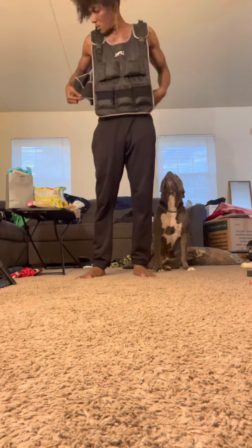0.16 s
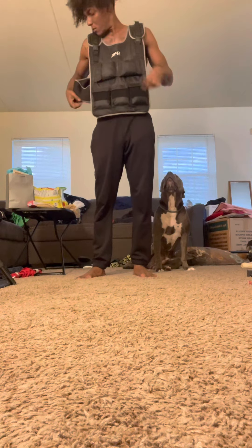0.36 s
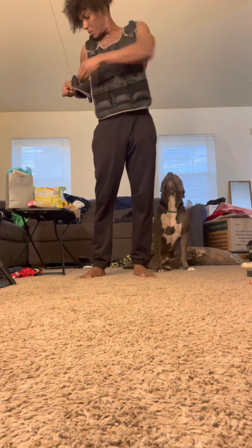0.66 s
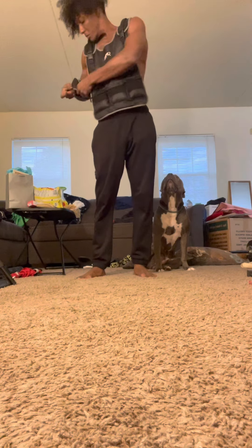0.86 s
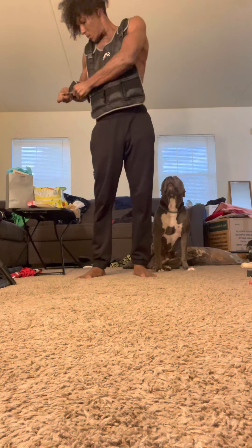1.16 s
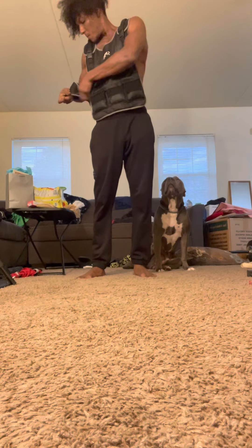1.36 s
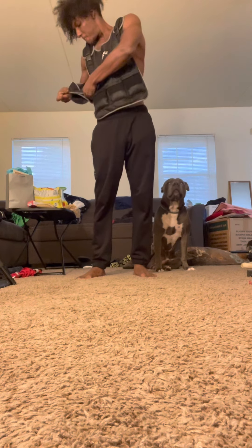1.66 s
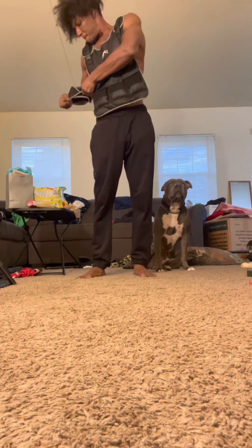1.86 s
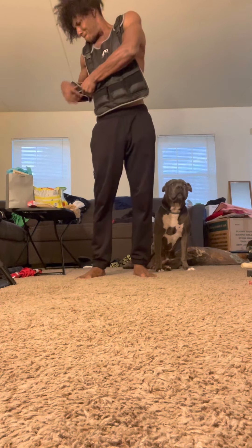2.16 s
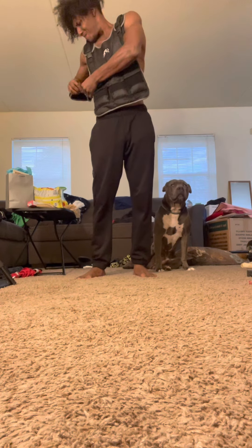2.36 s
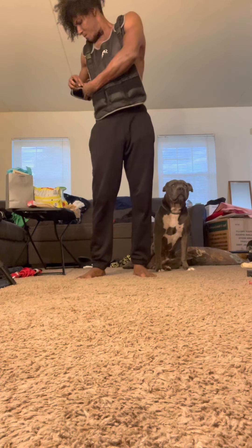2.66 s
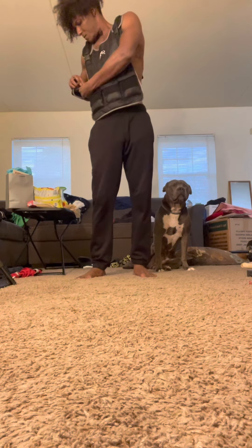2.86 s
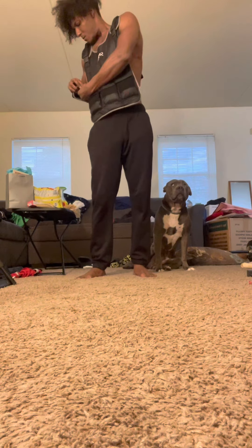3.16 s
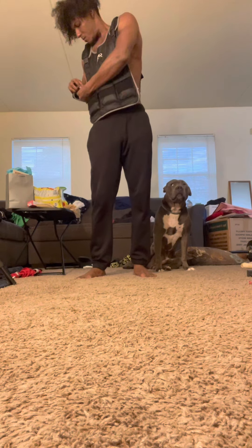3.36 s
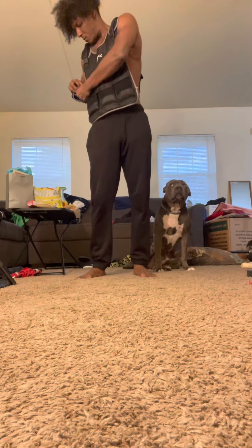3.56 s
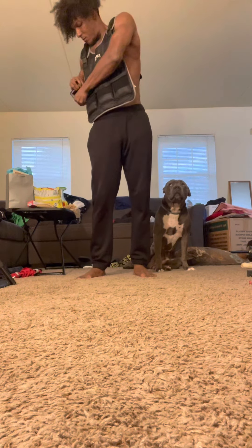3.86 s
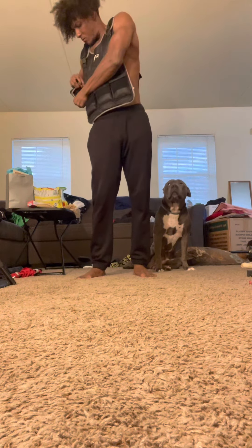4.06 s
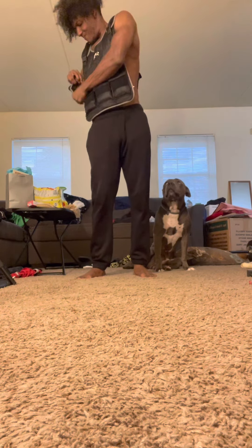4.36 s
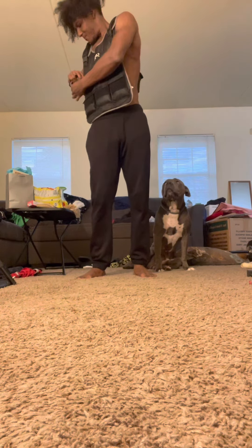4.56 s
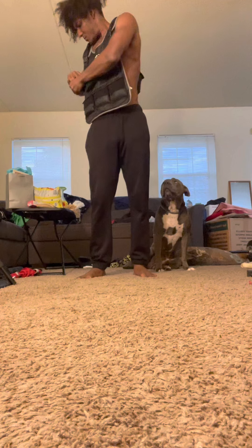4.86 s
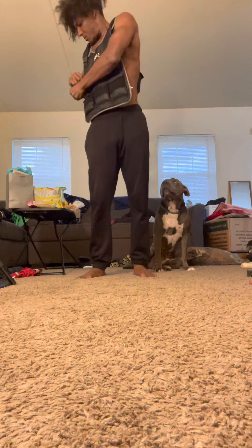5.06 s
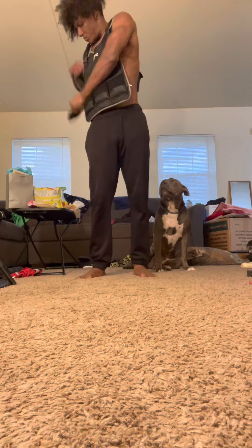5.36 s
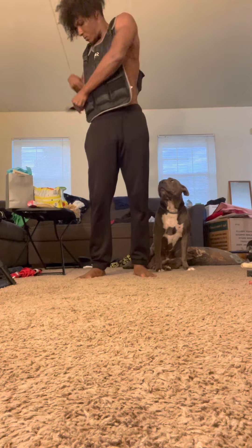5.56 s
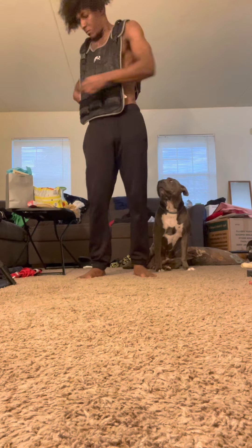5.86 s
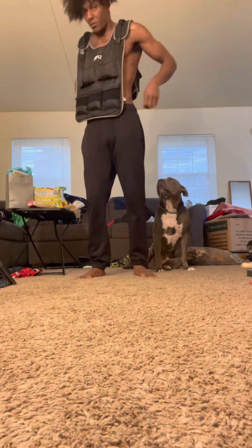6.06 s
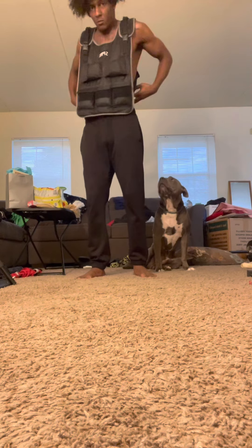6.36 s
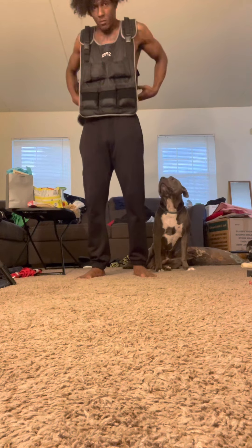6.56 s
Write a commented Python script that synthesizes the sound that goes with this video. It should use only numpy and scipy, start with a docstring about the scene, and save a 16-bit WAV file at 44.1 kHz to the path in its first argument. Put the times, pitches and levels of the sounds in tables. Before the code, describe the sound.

A quiet carpeted room with a very faint low rumble and short, soft reflections, heard from a phone about two metres away. From 0 to 2.7 seconds, fingers work at a padded vest's straps: small dry crunches and ticks, clearer near 0.9-1.05, 1.8-1.9 and 2.6, with thin nylon rustle and dull padding pats. Around 3 it is almost still, with a tiny bump and faint swishes. At about 3.55 hook-and-loop tape begins to rip, growing into a loud, stuttering rasp of crackling slips until 4.3. Small tugs and rustle fill 4.4-4.9. A second, harder and denser rip runs from 4.9 to 5.4, turning fuller and duller after 5.2 as the panel comes free, with a low soft thump near 5.35. It dies by 5.5. Quiet cloth slides follow, then several light crunches from 6.2 to 6.7.

```python
"""Ripping open a padded vest

Someone handles the hook-and-loop straps of a padded vest in a quiet carpeted room, two metres from a phone on the floor.
Cloth rustles as filtered random clicks, and the straps crunch under the fingers in short click showers.
A flap is ripped open in two pulls, a dense click stream broken by uneven slips.
As it comes free, noise and dull clicks deepen the loose panel, and low decaying tones thump as it flops."""
import sys
import numpy as np
from scipy import signal
from scipy.fft import rfft, irfft
from scipy.io import wavfile

SR = 44100
rng = np.random.default_rng(int(sys.argv[2]) if len(sys.argv) > 2 else 0)


def to_wav(s):
    """Save 16-bit WAV."""
    ch = np.atleast_2d(s).T  # columns
    pcm = np.round(np.clip(ch, -1, 1) * 32767)  # PCM
    wavfile.write(sys.argv[1], SR, pcm.astype(np.int16))


N = 295470
T = np.arange(N) / SR


def undb(db):
    """Decibels to gain."""
    return 10 ** (np.asarray(db) / 20)


def unit(x):
    """Scale to rms 1."""
    return x / np.sqrt(np.mean(x ** 2))


def spectrum(points, size=4096):
    """Join (Hz, dB) points on a log-frequency axis."""
    hz, db = np.transpose(points)
    bins_hz = np.fft.rfftfreq(size, 1 / SR)
    return np.interp(np.log(bins_hz + 1), np.log(hz), db)


def causal(db):
    """Minimum-phase impulse response of a dB spectrum."""
    cepstrum = irfft(np.log(undb(db)))
    half = len(cepstrum) // 2
    # fold the second half onto the first
    cepstrum[1:half] *= 2
    cepstrum[half + 1:] = 0
    return irfft(np.exp(rfft(cepstrum)))


def through(x, response):
    """Convolve, keeping the length."""
    return signal.oaconvolve(x, response)[:len(x)]


def colour(x, points):
    """Give x a spectrum; white input keeps its power."""
    response = causal(spectrum(points))
    return through(x, response / np.linalg.norm(response))


def gains(tables, fade_s=0.021):
    """One gain curve per dB column, fading out beyond the ends of each table."""
    out = 0
    for table in tables:
        s, *columns = np.transpose(table)
        inside_s = np.minimum(T - s[0], s[-1] - T)
        gate = np.clip(1 + inside_s / fade_s, 0, 1)
        out = out + gate * undb([np.interp(T, s, column) for column in columns])
    return out


def walk(rate):
    """Random wandering, joined by straight lines between `rate` knots per second."""
    knots = rng.standard_normal(8192)
    return np.interp(T * rate, np.arange(len(knots)), knots)


def snaps(rate, spread_db):
    """Random clicks, `rate` per second on average, many small and a few large; rms 1."""
    size = undb(spread_db * np.minimum(rng.exponential(size=N), 3.5))
    struck = rng.random(N) < rate / SR
    return unit(struck * size * rng.choice([-1, 1], N))


def add(track, s, sound):
    """Mix a sound into a track at time s."""
    start = max(int(s * SR), 0)
    track[..., start:start + sound.shape[-1]] += sound[..., :max(N - start, 0)]


def burst(grain, s, length, rise):
    """A shower of clicks that swells quickly and dies away; energy 1."""
    t = T[:SR // 8]
    shape = (1 - np.exp(-t / rise)) * np.exp(-t / length)
    shower = shape * grain.take(int(s * SR) + np.arange(len(t)), mode="wrap")
    return shower / np.linalg.norm(shower)


# spectrum of the house rumble: pitch_hz, level_db
HOUSE_TONE = [(20, -55), (35, -21), (55, -3), (76, 6.5), (100, -8), (125, 2), (180, -10), (237, -2.5),
              (400, -26), (800, -21.5), (2000, -32.5), (5000, -26), (10000, -32.5), (16000, -63)]
HUSH_DB = -59.5  # rms, before the stereo spread


def hush():
    """Low steady rumble of the house, as two independent coloured noises; returns mid and side."""
    return np.array([undb(HUSH_DB) * colour(rng.standard_normal(N), HOUSE_TONE) for _ in range(2)])


# soft bumps of the padded vest: start_s, pitch_hz, level_db, rise_s
VEST_BUMPS = [(1.592, 125, -50.5, 0.0049), (1.811, 131, -48.5, 0.014), (3.052, 256, -52, 0.009),
              (3.076, 144, -45, 0.0067), (5.333, 65.5, -32, 0.0094), (5.37, 80, -25.5, 0.011),
              (6.343, 86.5, -47, 0.014)]


def bumps():
    """The heavy padding swings a few cycles and stops."""
    out, t = np.zeros(N), T[:SR // 4]
    for s, hz, db, rise in VEST_BUMPS:
        swell = t / rise * np.exp(1 - t / rise)  # peaks at 1
        add(out, s, undb(db) * swell * np.sin(2 * np.pi * hz * t))
    return out


# cloth sliding before, between and after the pulls, one list each: time_s, nylon_level_db, padding_level_db
CLOTH_RUBS = [
    [(0.0, -65, -61.5), (0.17, -70.5, -68.5), (0.34, -70, -94), (0.72, -62, -65), (0.94, -57, -58.5),
     (1.45, -71, -75), (1.86, -65, -67), (2.05, -71.5, -92), (2.33, -73, -83), (2.5, -63.5, -88),
     (2.66, -61.5, -60), (2.82, -68, -77), (3.1, -80, -81), (3.52, -75.5, -87)],
    [(4.4, -54, -56.5), (4.52, -63.5, -66.5), (4.768, -61, -65), (4.88, -56.5, -61)],
    [(5.5, -51, -55), (5.596, -61, -56.5), (5.722, -59.5, -60), (5.96, -64.5, -62.5), (6.234, -64, -73),
     (6.414, -61.5, -64), (6.7, -57, -62)],
]
# smooth nylon swishing over itself: centre_s, pitch_hz, level_db, length_s
NYLON_SWISHES = [(0.061, 5300, -54, 0.014), (0.35, 10000, -69, 0.052), (3.015, 1920, -69.5, 0.022),
                 (3.378, 2050, -66, 0.023)]
# spectrum of the cloth, also heard in the grips: pitch_hz, level_db
CLOTH_TONE = [(100, -17), (500, -9), (950, -1), (1500, 6), (2200, 0), (3200, 0), (4200, -0.5), (5200, -7.5),
              (7000, -7), (14000, -31.5)]
# spectrum of the panel, also heard in the rip: pitch_hz, level_db
PANEL_TONE = [(30, -40), (100, -3.5), (190, -5), (260, 0.5), (550, 3.5), (750, -4), (1000, -1), (1300, 0),
              (1800, -23.5), (6000, -45)]
# bright spectrum of the treble, also heard in the rip: pitch_hz, level_db
TREBLE_TONE = [(1500, -7), (4000, -41), (5800, 11.5), (8000, 6.5), (10500, 1), (13000, -4), (14500, -9),
               (15500, -44)]


def rustle(treble_db=-8, catch_db=1.5, swish_q=5):
    """Woven cloth slides and catches, thread over thread; a fast slide sings at the rate of the weave."""
    rub, padding = gains(CLOTH_RUBS)
    catching = undb(catch_db * walk(45))
    threads = unit(snaps(rate=2200, spread_db=2.5) * catching)
    # now and then a stray hook ticks
    threads = threads + 0.5 * snaps(rate=40, spread_db=2.5)
    swishes = np.zeros(N)
    for s, hz, db, length in NYLON_SWISHES:
        singing = unit(signal.lfilter(*signal.iirpeak(hz, swish_q, fs=SR), threads))
        swishes += undb(db) * np.exp(-((T - s) / length) ** 2) * singing
    return (colour(rub * threads, CLOTH_TONE) + swishes
            + colour(padding * threads, PANEL_TONE)
            + colour(undb(treble_db) * rub * threads, TREBLE_TONE))


# grips and tugs on the straps, levels before the trims in grips():
# start_s, level_db, padding_re_level_db, treble_re_level_db, length_s, first_click_sharpness_db
STRAP_GRIPS = [(0.0575, -43.5, -24, -38, 0.018, -1), (0.332, -46, -4.5, -24, 0.025, -3),
               (0.4603, -40.5, -20.5, -19.5, 0.0084, -0.5), (0.568, -36.5, -14, -23.5, 0.009, 5.5),
               (0.647, -42.5, -16, -18, 0.0079, 2), (0.698, -38.5, -17, -19.5, 0.0085, 3),
               (0.742, -41.5, -17, -24, 0.0075, 3), (0.9296, -29.5, -22.5, -45, 0.014, -4),
               (1.023, -37, -44, -16, 0.005, 3.5), (1.042, -30.5, -31, -27, 0.019, -4),
               (1.2501, -39.5, -25, -49, 0.012, 5), (1.5633, -45.5, -14.5, -28, 0.01, 1.5),
               (1.745, -39, -13, -43, 0.013, 5.5), (1.8054, -31, -11.5, -25.5, 0.012, -5),
               (1.934, -30.5, -30, -41, 0.0061, -1.5), (2.0034, -43.5, -28, -22, 0.014, -1),
               (2.3046, -39, -12, -19, 0.028, 7), (2.4453, -48.5, -11, -9, 0.01, 5),
               (2.4663, -38, -15.5, -21, 0.016, 3), (2.611, -34, -53, -7.5, 0.0055, 3.5),
               (2.642, -35.5, -40, -20.5, 0.016, -6), (3.047, -47.5, -2, -26, 0.014, -4),
               (4.494, -39, -17, -29, 0.0071, 3.5), (4.5835, -40.5, -37, -23, 0.015, 2),
               (4.7187, -29, -11, -22.5, 0.0054, 4.5), (4.805, -31, -38, -18.5, 0.0092, 4),
               (4.835, -33, -29, -9, 0.0059, -12), (4.867, -36, -21, -17, 0.0091, -6),
               (6.2217, -34.5, -14, -30, 0.019, 1.5), (6.291, -35.5, -12, -29, 0.028, 0),
               (6.358, -30, -22, -28, 0.01, -7), (6.503, -37.5, -9.5, -14, 0.033, 0),
               (6.6268, -34.5, -14, -19, 0.0072, -1), (6.686, -35.5, -12, -21, 0.013, 2.5)]
# dull answer of the padding, also heard in the rip: pitch_hz, level_db
PAT_TONE = [(80, -19), (200, -4), (520, 1.5), (750, 0.5), (1250, -0.5), (2000, -15.5), (6000, -30),
            (15000, -53)]
# bright tick of stiff nylon under the fingers: pitch_hz, level_db
NYLON_TONE = [(1000, -19.5), (2500, -10), (4300, 0.5), (5300, -3.5), (8000, -1.5), (11000, -8.5),
              (13500, -16), (15500, -26)]
GRIP_S = 0.006  # length at which a crunch keeps energy 1 before its level; longer ones get more


def grips(click_db=8, crunch_db=12, pat_db=28, treble_db=27, tick=0.57, pat_lingers=1.5):
    """Each grip is a click and a short crunch of hooks, with a dull pat from the padding."""
    crunches, pats, ticks = np.zeros((3, N))
    grain = snaps(rate=3000, spread_db=2.5)
    for s, db, padding, treble, length, sharpness in STRAP_GRIPS:
        shower = burst(grain, s, length, rise=0.0015) * np.sqrt(length / GRIP_S)
        bright_db = db + treble + treble_db
        add(crunches, s, undb(db + crunch_db) * shower)
        # one-sample first clicks
        add(crunches, s, undb([db + click_db + sharpness]))
        add(ticks, s, undb(bright_db) * shower)
        add(ticks, s, tick * undb([bright_db + sharpness]))
        pat = burst(grain, s, length * pat_lingers, rise=0.0039)
        add(pats, s, undb(db + padding + pat_db) * pat)
    return colour(crunches, CLOTH_TONE) + colour(pats, PAT_TONE) + colour(ticks, NYLON_TONE)


# big slips, where a patch of hooks lets go at once, levels before slip_db: start_s, level_db, length_s
BIG_SLIPS = [(3.5683, -31.5, 0.0026), (3.609, -25, 0.0041), (3.657, -18.5, 0.005), (3.7472, -14.5, 0.004),
             (3.7793, -16.5, 0.0057), (3.797, -15.5, 0.004), (3.8095, -13, 0.0057), (3.8867, -13, 0.0058),
             (3.8962, -11, 0.0054), (3.933, -32, 0.0041), (3.9913, -16.5, 0.0077), (4.0154, -13, 0.004),
             (4.0404, -13.5, 0.005), (4.0811, -20.5, 0.0044), (4.1013, -13.5, 0.0049),
             (4.132, -18.5, 0.0043), (4.1814, -18, 0.005), (4.2136, -15.5, 0.0075), (4.911, -38, 0.004),
             (4.9325, -16.5, 0.005), (4.9686, -11, 0.0047), (4.979, -18, 0.0037), (5.022, -12, 0.0083),
             (5.0384, -14, 0.0043), (5.0554, -11, 0.0041), (5.0868, -12.5, 0.0035), (5.117, -14, 0.0086),
             (5.1602, -16, 0.005), (5.181, -16, 0.0047), (5.194, -17, 0.0065), (5.3118, -14, 0.011)]
# the flap holds fast for a moment before each big slip
STICK_S, STICK_DB = 0.014, -2


def sticking():
    """Gain of the stream of hooks: it falls as the flap holds and comes back with the slip."""
    held, t = np.zeros(N), T[:SR // 8]
    hold = np.exp(-(t[::-1] / STICK_S) ** 2)
    for s, _, _ in BIG_SLIPS:
        add(held, s - t[-1], hold)
    return undb(STICK_DB * np.minimum(held, 1))


SLIP_S = 0.003  # length at which a slip keeps energy 1 before its level; longer ones get more


def torn_patches(slip_db=9.0, snap=0.43, rise_s=0.0024):
    """Each big slip is a shower of hook clicks with one sharp snap near its start."""
    patches, grain = np.zeros(N), snaps(rate=5900, spread_db=5.5)
    for s, db, length in BIG_SLIPS:
        slip = burst(grain, s, length, rise=rise_s) * np.sqrt(length / SLIP_S)
        slip[SR // 2000] += snap  # half a millisecond in
        add(patches, s, undb(db + slip_db) * slip)
    return patches


SMALL_SLIPS_PER_S, SMALL_SLIP_S = 120, 0.0022  # mean rate; decay time


def juddering(judder_db=2.0):
    """Uneven gain of the peel: random wandering, lifted by small slips that die away at once."""
    starts = 1.0 * (rng.random(N) < SMALL_SLIPS_PER_S / SR)
    slipping = through(starts, np.exp(-T[:SR // 8] / SMALL_SLIP_S))
    return undb(judder_db * walk(260)) * (1 + slipping)


# the two pulls, one list each; how fast the flap peels, as a level before the layer trims: time_s, level_db
PULLS = [
    [(3.54, -61.5), (3.596, -50), (3.63, -54), (3.666, -45.5), (3.706, -57), (3.766, -42), (4.248, -45),
     (4.324, -52.5), (4.4, -85)],
    [(4.9, -74), (4.912, -36), (4.928, -45.5), (5.04, -43), (5.154, -43), (5.206, -36), (5.24, -40.5),
     (5.364, -38.5), (5.48, -63.5)],
]
# a taut flap rasps louder, one value per pull, before rasp_db: rasp_re_peel_db
PULL_RASP_DB = [5, 8]
# spectrum of the snapping hooks: pitch_hz, level_db
HOOK_TONE = [(100, -32.5), (300, -19.5), (600, -5.5), (950, -8.5), (1400, -0.5), (2050, 0), (3000, -3),
             (4200, -2.5), (5200, -8.5), (7000, -23.5), (14000, -30)]
# spectrum of the fluttering loose panel: pitch_hz, level_db
LOOSE_TONE = [(25, -31), (60, -18), (100, -2.5), (170, -0.5), (250, 2), (350, -7.5), (600, -6), (2000, -27),
              (12000, -48)]
# late in the second pull the panel comes free, then goes slack, and the rasp fades by FREE_RASP_DB
FREE_S, FREE_TAKES_S, SLACK_TAKES_S, FREE_RASP_DB = 5.168, 0.0067, 0.2, -5.5


def rip(rasp_db=1.0, panel_db=-4, treble_db=4.0, flap_db=1, padding_db=1,
        slip_treble_db=-18, slip_panel_db=-14):
    """Hooks snap loose in a juddering stream and shake the panel; slips tear out whole patches."""
    pulls = [gains([curve])[0] for curve in PULLS]
    peel, stick = sum(pulls), sticking()
    free = np.clip((T - FREE_S) / FREE_TAKES_S, 0, 1)
    slack = np.clip((T - FREE_S) / SLACK_TAKES_S, 0, 1)
    taut = sum(undb(db) * pull for db, pull in zip(PULL_RASP_DB, pulls))
    rasp = stick * taut * undb(rasp_db + FREE_RASP_DB * slack)
    panel = undb(panel_db) * stick * peel
    treble = undb(treble_db) * np.sqrt(stick) * peel
    # single hooks snap, and the fabric under them jerks in the same uneven rhythm
    judder = juddering()
    hooks = unit(snaps(rate=1000, spread_db=3.3) * judder)
    jerks = unit(snaps(rate=2000, spread_db=2.5) * judder)
    patches = torn_patches()
    flutter = undb(flap_db) * slack * peel * rng.standard_normal(N)
    return (colour(rasp * hooks + patches, HOOK_TONE)
            + colour(panel * jerks + undb(slip_panel_db) * patches, PANEL_TONE)
            + colour(undb(padding_db) * free * peel * jerks, PAT_TONE)
            + colour(treble * hooks + undb(slip_treble_db) * patches, TREBLE_TONE)
            + colour(flutter, LOOSE_TONE))


def reflections(t60_s=0.33, treble_t60_s=0.32, early_db=-3, early_s=0.0074):
    """One echo pattern of the room: sparse early echoes and a short diffuse tail."""
    t = T[:SR // 2]
    low, high = (signal.butter(2, 4500, kind, fs=SR, output="sos") for kind in ("low", "high"))
    noise = rng.standard_normal((3, len(t)))
    tail = signal.sosfilt(low, noise[0]) * undb(-60 * t / t60_s)
    tail += signal.sosfilt(high, noise[1]) * undb(-60 * t / treble_t60_s)
    tail *= np.minimum(t / 0.0093, 1)  # the tail builds up over 9.3 ms
    sparse = (rng.random(len(t)) < 2500 / SR) * (t > 0.002)
    early = noise[2] * np.exp(-t / early_s) * sparse
    return tail / np.linalg.norm(tail) + undb(early_db) * early / np.linalg.norm(early)


def room(x, wet_db=-3, count=4):
    """Direct sound plus echoes whose pattern shifts at random as the hands move; returns mid and side."""
    blend = np.array([walk(12) for _ in range(count)]) ** 2
    blend /= np.linalg.norm(blend, axis=0)
    mid, side = (undb(wet_db) * sum(through(x * share, reflections()) for share in blend)
                 for _ in range(2))
    # the first sound in the side is a glancing bounce, a millisecond late
    glance = np.roll(x, SR // 1000)
    return 0.87 * np.array([x + mid, glance + side])


# stereo width: pitch_hz, side_re_mid_db
STEREO_WIDTH = [(60, -22), (350, -13), (750, -9), (1000, 4.5), (1450, -7.5), (1900, -11), (2300, -21.5),
                (2950, 1), (3700, -9), (4500, 0), (4900, -8), (5200, -4.5), (6000, -5.5), (10600, -9),
                (11300, -26)]


def scene():
    """Vest and room, spread to left and right."""
    mid, side = room(rip() + grips() + rustle()) + hush()
    width_db = spectrum(STEREO_WIDTH)
    # the mid gives up the power that the side takes
    mid_db = -10 * np.log10(1 + undb(width_db) ** 2)
    mid = through(mid + bumps(), causal(mid_db))
    side = through(side, causal(mid_db + width_db))
    return np.array([mid + side, mid - side])


# the phone's own resonances, before trim_db: pitch_hz, width_hz, peak_db
PHONE_MODES = [(1796, 32, 8), (2032, 184, 8), (2157, 100, 10.5), (2550, 55, 6.5), (2776, 51, 9.5)]
# phase between the channels: pitch_hz, left_lead_radians
LEFT_LEAD = [(0, 0), (750, 0), (1250, 1), (1650, .2), (2800, .9), (3400, -.1), (4350, .2), (4900, 3.14),
             (5700, 3.6), (8000, 4.3), (11000, 6.28)]
TOP_HZ = 15400  # upper edge of the phone's passband


def record(dry, trim_db=-1):
    """The phone rings near 2 kHz, turns the phase between its channels and cuts the top."""
    hz = np.fft.rfftfreq(N, 1 / SR)
    ring = 1
    for mode_hz, width_hz, db in PHONE_MODES:
        damping = 1j * hz * width_hz
        ring = ring + (undb(db) - 1) * damping / (mode_hz ** 2 - hz ** 2 + damping)
    # each channel takes half of the phase lead, with opposite signs
    lead = np.interp(hz, *np.transpose(LEFT_LEAD))
    turn = np.exp(0.5j * lead * np.array([[1], [-1]]))
    # 128 samples of room before the peak hold the part that leads; the delay is cut off again
    responses = np.roll(irfft(undb(trim_db) * ring * turn, N), 128, axis=1)[:, :2048]
    heard = [signal.oaconvolve(x, r)[128:N + 128] for x, r in zip(dry, responses)]
    top_cut = signal.ellip(8, 0.2, 70, TOP_HZ, fs=SR, output="sos")
    return signal.sosfilt(top_cut, heard)


dry = scene()
out = record(dry)
to_wav(out)
```